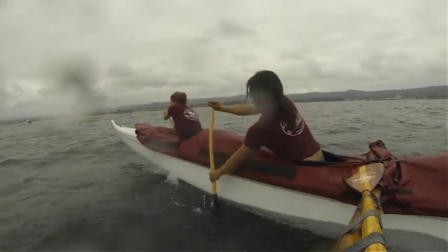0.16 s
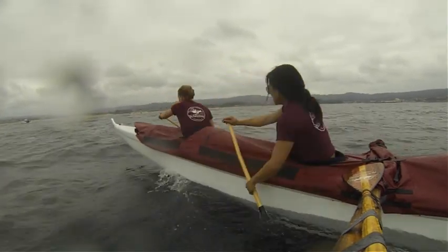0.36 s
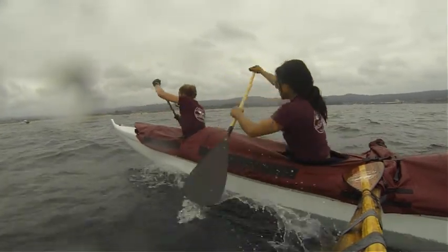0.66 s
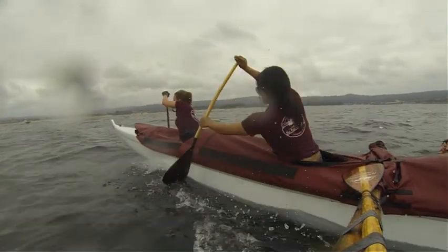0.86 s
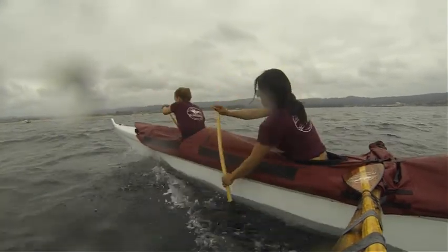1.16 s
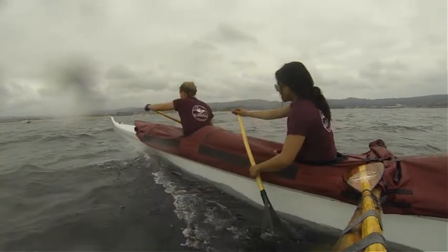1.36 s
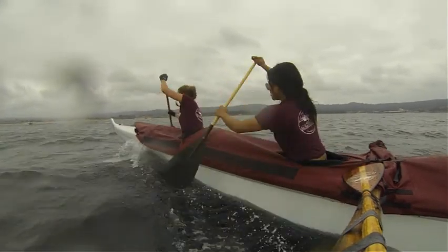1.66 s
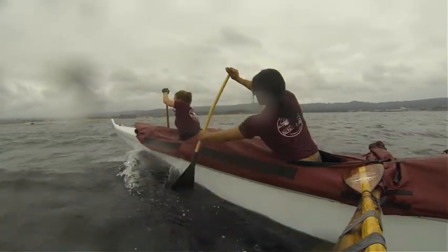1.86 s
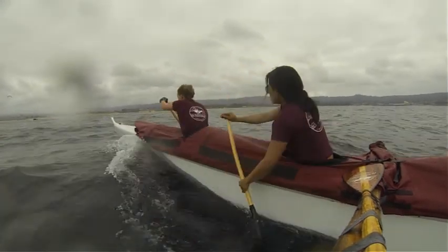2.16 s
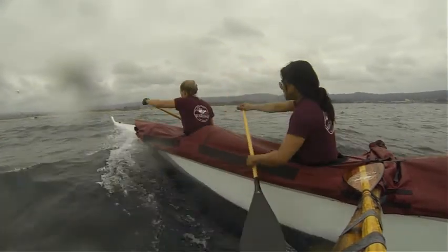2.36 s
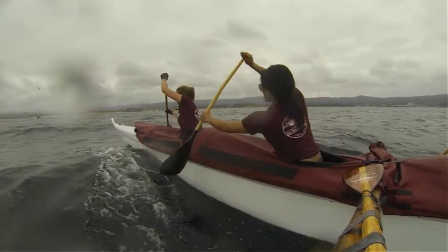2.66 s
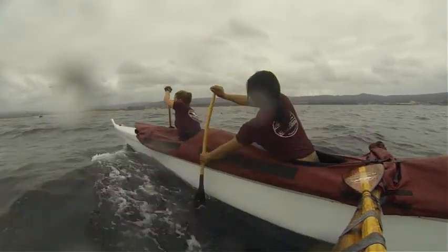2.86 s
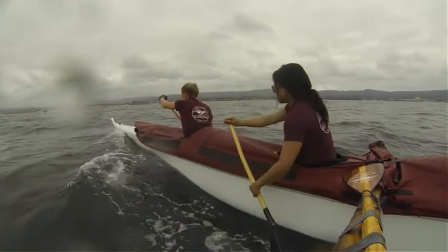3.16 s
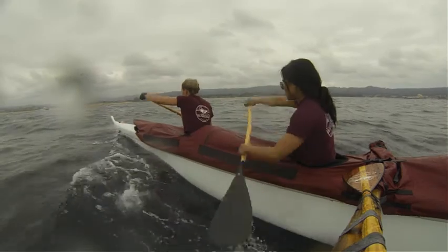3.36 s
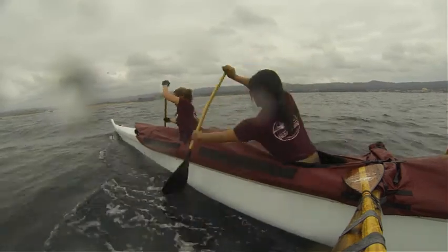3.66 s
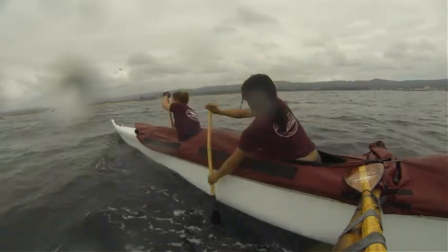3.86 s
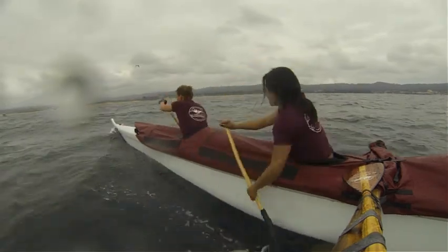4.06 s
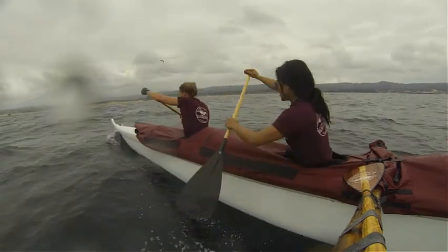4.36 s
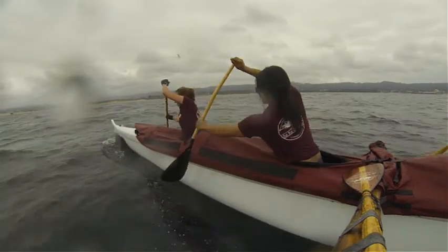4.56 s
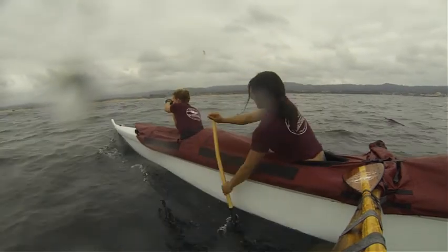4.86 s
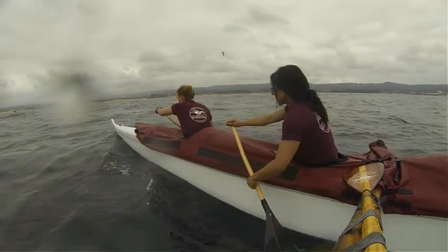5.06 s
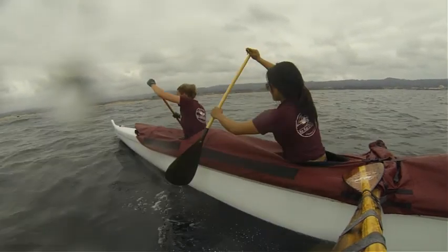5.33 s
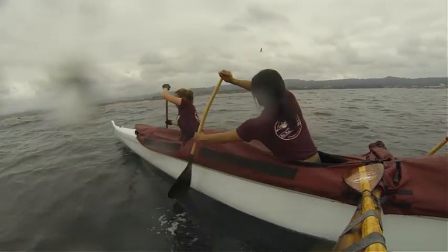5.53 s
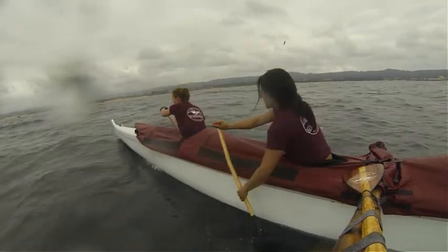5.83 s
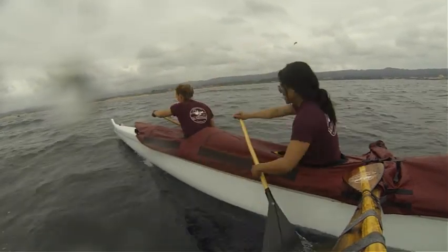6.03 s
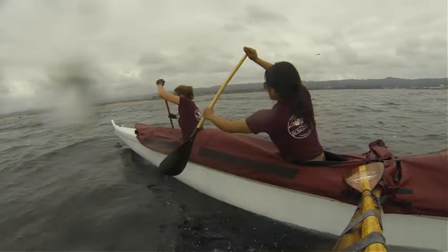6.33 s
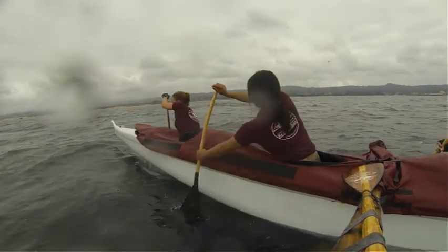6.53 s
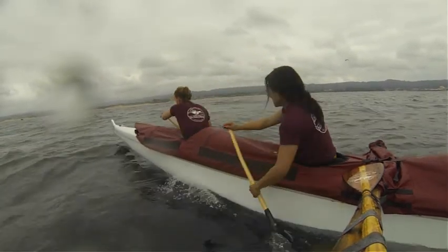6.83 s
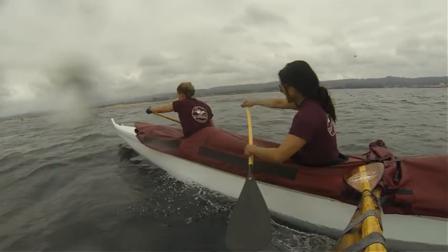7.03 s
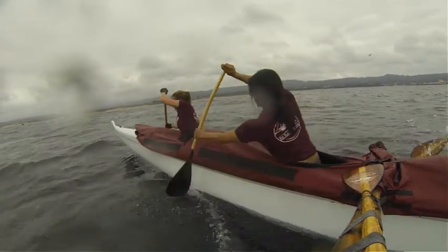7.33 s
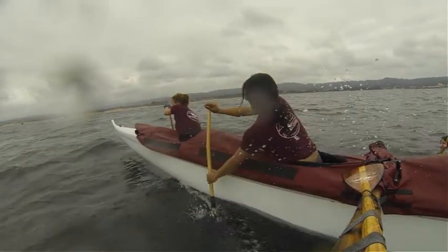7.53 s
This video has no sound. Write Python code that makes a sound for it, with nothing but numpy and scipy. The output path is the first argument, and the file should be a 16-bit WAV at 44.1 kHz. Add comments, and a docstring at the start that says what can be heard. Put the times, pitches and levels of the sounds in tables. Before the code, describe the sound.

A microphone in a sealed housing on an outrigger canoe's boom hears choppy water closely but muffled. Deep slow-pulsing sway, low rumble, a wavering thrum and soft bubbling hull wash run throughout, with thin fizz and faint whistles tracking the bass. From 0 to 0.6 s, waves hit in a dense cluster of loud hollow knocks, quickly smothered. It thins to lighter knocks and single splashes until about 1.9 s, when a quick run of plopping splashes arrives. A hard knock rings at 2.5 s. From 3.1 to 3.5 s splashes come in a longer, busier run, with more at 3.8 s. Knocks crowd between 3.8 and 5 s, and the wash swells around 4.7 and 5.6 s. Knocks and splashes mix again at 5.6 to 6.4 s, then ease, with a firm thud near 7 s. The strongest splash bursts at 7.5 s, just before the end.

```python
"""A microphone in a sealed housing rides a canoe's outrigger boom in chop; sway, thrum and wash run throughout.
0-0.6 s: dense knocks, damped modes struck by waves. 1.9 s: a run of splashes, plops plus noise bursts.
2.5 s: hard knocks. 3.1-3.5 s: a longer run of splashes. 3.8-5 s: frequent knocks. 5.8-6.4 s: more of both.
7.5 s: the strongest splash. Sway is a drifting sine, thrum is narrow noise, water is noise with bubbles.
A crude rate converter mirrors the strong bass into faint whistles throughout."""
import sys
import numpy as np
from scipy import signal
from scipy.fft import rfft, irfft, next_fast_len
from scipy.io import wavfile
from scipy.ndimage import uniform_filter1d, map_coordinates

SR = 44100
rng = np.random.default_rng(int(sys.argv[2]) if len(sys.argv) > 2 else 0)


def dump(signal):
    """Clip the signal to [-1, 1] and save it as 16-bit WAV at the path in sys.argv[1]."""
    limited = np.clip(np.atleast_2d(signal).T, -1, 1)
    pcm = np.round(limited * 32767).astype(np.int16)
    wavfile.write(sys.argv[1], SR, pcm)


def how_loud(loudness_db):
    """Turn decibels into a plain amplitude multiplier (0 dB gives 1, 20 dB gives 10)."""
    steps = np.asarray(loudness_db, float) / 20
    return 10 ** steps


N = 339040  # samples

# Levels are relative: each layer trims them.
# Slow bending of the boom: time_s, sway_db
SWAY_KNOTS = [(0.0, -22), (0.28, -23), (0.45, -35.5), (0.83, -19), (1.09, -36), (1.39, -29.5),
              (1.65, -29.5), (1.84, -35), (3.23, -29.5), (3.36, -20), (3.55, -27.5), (3.64, -42),
              (3.75, -31.5), (3.92, -41), (4.3, -27), (4.9, -22.5), (5.1, -39), (5.16, -29.5), (5.5, -37),
              (5.59, -22), (5.78, -34), (5.85, -42), (5.95, -30.5), (6.23, -32), (6.34, -24), (6.59, -40.5),
              (6.94, -29), (6.98, -34), (7.54, -22.5), (7.69, -39)]
# Passing water: time_s, thrum_db, wash_db, spray_db, fizz_db
WATER_KNOTS = [(0.0, -27.5, -35.5, -46.5, -52), (0.23, -41, -50, -56, -66.5), (0.85, -41, -48.5, -53, -62),
               (1.33, -46.5, -54.5, -61, -66.5), (1.97, -37, -50.5, -55.5, -63.5),
               (2.12, -39, -48.5, -53.5, -64), (2.5, -36, -51.5, -57, -68),
               (2.85, -43.5, -56, -58.5, -63.5), (3.08, -42.5, -46.5, -53.5, -66),
               (3.32, -35.5, -50.5, -56.5, -66.5), (3.79, -40, -50.5, -57, -64.5),
               (4.43, -34.5, -48.5, -54, -65.5), (4.67, -37, -40, -48.5, -62), (5.03, -32, -43, -48, -61),
               (5.33, -43, -53, -54, -64), (5.52, -40, -40.5, -50, -64), (5.7, -38, -40, -51, -62.5),
               (5.97, -36.5, -44.5, -52, -65.5), (6.38, -42, -51, -57, -64), (6.85, -40, -49, -53.5, -66),
               (7.3, -39, -49, -53.5, -60.5), (7.69, -41, -49, -58.5, -66)]
# Thrumming modes of the boom, upper then lower: pitch_hz, width_hz
THRUM_MODES = [(234.2, 29), (144, 19.4)]
# Waves on the hull: start_s, upper_db, lower_over_upper_db, thud_db
KNOCK_EVENTS = [(0.008, -26.5, -5, -34), (0.044, -19, -3.5, -22.5), (0.068, -13, -9.5, -35),
                (0.105, -23.5, -17.5, -34), (0.184, -30, -21, -30), (0.3, -22.5, -22, -49),
                (0.382, -12.5, -19, -38.5), (0.392, -10, -22, -19.5), (0.523, -22.5, -2, -24.5),
                (0.584, -29, -10, -26.5), (0.872, -19, -4.5, -44), (1.0, -25, -10, -31),
                (1.298, -32, -8, -52), (1.504, -30.5, -9, -32), (1.644, -26.5, -28, -45),
                (1.865, -25.5, -15, -52), (1.889, -23, -8.5, -63), (2.219, -24.5, -14.5, -45),
                (2.364, -24, -16.5, -36), (2.504, -8.5, -10.5, -27), (2.543, -17, -4.5, -34),
                (3.039, -37, -16, -24), (3.109, -18.5, -12, -27.5), (3.156, -13, -4.5, -45),
                (3.213, -24, 4.5, -37), (3.449, -20.5, -2, -38), (3.636, -23.5, -17, -41),
                (3.688, -23, -14, -38), (3.814, -26, -4, -37), (4.099, -21, 0.5, -38),
                (4.189, -13.5, -12.5, -28), (4.31, -28, -1.5, -30), (4.372, -13.5, -30, -55),
                (4.529, -20.5, -12, -49), (4.578, -17, -16, -48), (4.637, -20, -3, -46),
                (4.764, -14.5, -29, -41), (4.89, -18, -6, -37), (4.996, -29, -6, -37),
                (5.425, -28, -23, -55), (5.581, -14, -9.5, -51), (5.615, -16.5, -11, -51),
                (5.698, -19, -7.5, -53), (5.811, -17, 0.5, -58), (5.887, -35.5, 15, -48),
                (5.982, -22.5, -17.5, -42), (5.993, -16, -9, -20.5), (6.274, -23, -21, -60),
                (6.372, -20.5, -14, -54), (6.721, -25.5, -17, -49), (6.871, -27, -19, -55),
                (6.956, -16.5, -9.5, -20.5), (7.35, -29, -0.5, -51), (7.552, -30, -2, -51)]
# Other boom modes (thud, middle, top, skin): pitch_hz, base_t60_s
BOOM_MODES = [(81, 0.1), (356.5, 0.094), (687.6, 0.13), (522, 0.052)]
# Water thrown at hull and housing: start_s, spray_db, slap_over_spray_db, fizz_over_spray_db, rise_s
SPLASH_EVENTS = [(0.085, -46.5, -23, -22, 0.0024), (0.191, -44.5, -19, -1.5, 0.003),
                 (0.518, -31.5, -21, -21.5, 0.0025), (0.585, -39, -3, -13.5, 0.0019),
                 (0.7485, -37.5, -10, -46, .002), (0.884, -34, -13, -21.5, 0.004),
                 (1.228, -43, -14, -16, 0.00065), (1.5556, -37, -11, -30, 0.003),
                 (1.854, -33, -20, -18.5, 0.0018), (1.878, -31.5, -5.5, -21, 0.0027),
                 (1.895, -32.5, -6, -21, 0.0034), (1.927, -40, -13, -22, 0.0036),
                 (1.952, -34, -3.5, -24.5, 0.0028), (1.975, -42, -4, -24.5, 0.0022),
                 (2.186, -46, -0.5, -12.5, 0.0015), (2.385, -45.5, 10, -13.5, 0.0036),
                 (2.504, -35, 10, -13.5, 0.0013), (3.0844, -39, -1, -10.5, .002),
                 (3.121, -32.5, -23, -16.5, 0.0066), (3.137, -29, -6.5, -15, 0.0049),
                 (3.149, -31, -4.5, -14.5, 0.0031), (3.357, -37, -28, -23.5, 0.00085),
                 (3.4192, -31.5, -18, -34.5, 0.0018), (3.442, -31, -12.5, -17.5, .003),
                 (3.472, -27.5, -13.5, -29, 0.0016), (3.493, -29.5, -23, -24, 0.0017),
                 (3.512, -30, -18, -30, 0.0014), (3.52, -43.5, 5, -21, 0.00099),
                 (3.537, -42, -20, -25.5, 0.00091), (3.765, -26.5, -36, -36, 0.00094),
                 (3.783, -37.5, -8, -29, 0.0013), (3.939, -33, -8, -11.5, 0.01),
                 (4.058, -36, -5, -19, 0.0042), (4.432, -33.5, -11, -28.5, 0.004),
                 (4.4866, -28, -17, -27.5, .002), (4.521, -40, 9, -18, 0.003), (4.555, -35, -6, -24, 0.005),
                 (4.785, -41.5, -6, -20, 0.0024), (5.18, -30.5, -13, -15.5, 0.0055),
                 (5.2907, -46, 6, -25, 0.00078), (5.43, -32, -28, -35.5, 0.00082),
                 (5.764, -56, -10, -8, 0.0011), (5.804, -39.5, 13.5, -12, 0.002),
                 (5.822, -42.5, 13, -14, 0.0018), (5.841, -43.5, 5, -10, 0.0023),
                 (6.2526, -30, -6.5, -17.5, 0.0027), (6.285, -37.5, -15, -26, 0.0025),
                 (6.317, -35, -15, -34, 0.0017), (6.331, -35, -2.5, -25.5, 0.0012),
                 (6.356, -48, -2, -18.5, 0.0012), (6.585, -34, -4, -13, 0.0048),
                 (6.7057, -39.5, -24, -13, 0.0007), (6.777, -53, -28, -22.5, 0.0011),
                 (6.853, -38.5, -10, -7, 0.004), (7.281, -43.5, -2, -21.5, 0.0038),
                 (7.32, -40.5, -6, -18, 0.0019), (7.403, -38, -19, -23, 0.0019),
                 (7.52, -21, -18, -21.5, 0.0039), (7.55, -39.5, -16, -21.5, 0.0012),
                 (7.576, -37, -7, -27, 0.0037), (7.652, -32.5, -34, -27, 0.00083)]
# Low rumble spectrum: frequency_hz, density_db_per_hz
RUMBLE_SPECTRUM = [(16, -27.5), (28, 2.5), (64, -11.5), (102, -19.5), (120, -22), (160, -43.5), (260, -120)]
# Hull wash spectrum: frequency_hz, density_db_per_hz
WASH_SPECTRUM = [(80, -120), (110, -4.5), (190, 1.5), (280, 1), (400, -4), (520, -8.5), (600, -16),
                 (686, -7), (780, -13), (950, -15), (1300, -120)]
# Spray in the housing's cavity: frequency_hz, density_db_per_hz
SPRAY_SPECTRUM = [(800, -58), (950, -1), (1080, -1.5), (1200, -1.5), (1340, 2.5), (1550, -2.5), (1750, -11),
                  (1950, -39), (2500, -61)]
# Fine fizz spectrum: frequency_hz, density_db_per_hz
FIZZ_SPECTRUM = [(1120, -25), (1900, 2), (2350, -3), (3090, -1), (3910, -8), (4170, -8), (5200, -9.5),
                 (5920, -13), (7830, -12.5), (8980, -15), (11700, -40), (19800, -120)]

SLIP_HZ = 3889.5  # rate of the converter's timing error
SWAY_HZ, SWAY_DRIFT_HZ = 17.1, 0.282
WANDER_SHARE = 0.055  # the water's load shifts the thrumming pitch
LOWER_DB = -5  # lower thrum mode relative to upper, in steady flow
THUD_DB, MIDDLE_DB, TOP_DB = 5.5, -12.5, -0.5  # trims: thud, middle mode re upper, top mode re slap
THRUM_T60_S, DETUNE_SHARE = (0.15, 0.29), 0.023  # base decay of upper, lower after a knock; pitch scatter
LINGER_S_PER_S = 16  # extra burst t60 per second of rise
PLOP_HZ, PLOP_SPREAD_LOG = 1349, 0.05
PUSH_S = 0.0027  # how long a hard wave leans on the hull
SOFTER_DB_PER_DB, HARD_DB = 0.45, 20  # softening once the ring tops the thud by HARD_DB
CLIMB_PER_S = 1.3  # phase stretch that bends a plop upward
CHURN_DB = 1.54  # water shakes the ring level


def unit(x):
    """x at rms 1."""
    return x / np.sqrt(np.mean(np.abs(x) ** 2) + 1e-20)


def curves(rows):
    """Each column after time_s, interpolated to every sample."""
    s, *cols = np.transpose(rows)
    return [np.interp(np.arange(N) / SR, s, col) for col in cols]


def wobble(knots_per_s):
    """A smooth random curve."""
    knots = rng.standard_normal(int(N * knots_per_s / SR) + 4)
    return map_coordinates(knots, [np.arange(N) * knots_per_s / SR])


def coloured(x, spectrum):
    """x filtered by spectrum points joined on a log frequency axis."""
    m = next_fast_len(N + 8192)
    hz, db = np.transpose(spectrum)
    bins_hz = np.fft.rfftfreq(m, 1 / SR)
    gain = how_loud(np.interp(np.log(bins_hz + 1), np.log(hz + 1), db))
    return irfft(rfft(x, m) * gain, m)[:N]


def rush(spectrum, patchy_db):
    """Noise of rms 1 with small time-frequency patches of random gain."""
    z = signal.stft(rng.standard_normal(N + 1024), nperseg=1024)[2]
    field = uniform_filter1d(rng.standard_normal(z.shape), size=4, axis=0)
    field = uniform_filter1d(field, size=4, axis=1)
    noise = signal.istft(z * how_loud(patchy_db * unit(field)), nperseg=1024)[1][:N]
    return unit(coloured(noise, spectrum))


def drops(spectrum, count, mid_hz, spread, cycles, size_db):
    """Random bubbles of varied size: short damped tones rising in pitch; rms 1."""
    u, t = rng.random((count, 2)), np.arange(1200) / SR
    hz = np.clip(mid_hz * np.exp(spread * rng.standard_normal((count, 1))), 300, 9000)
    life = t * hz / cycles
    tone = np.sin(2 * np.pi * hz * t * (1 + 0.06 * life)) * life * np.exp(-2 * life)
    size = how_loud(-size_db * np.log(1.02 - u[:, 1:]))
    at = (u[:, :1] * N).astype(int) + np.arange(len(t))
    mix = np.bincount(at.ravel(), (size * tone).ravel(), N + len(t))[:N]
    return unit(coloured(mix, spectrum))


def bursts(levels_db, t60):
    """Splash envelope; a slower rise lasts longer."""
    out, t = np.zeros(N + SR), np.arange(SR // 2) / SR
    for (s, *_, rise), db in zip(SPLASH_EVENTS, levels_db):
        decay = how_loud(db - 60 * t / (t60 + LINGER_S_PER_S * rise))
        attack = (1 - np.exp(-t / max(rise, 1 / SR))) ** 2
        out[round(s * SR):][:len(t)] += decay * attack
    return out[:N]


def strike(out, s, modes, rise, bulge=1, climb=0):
    """Adds damped (hz, db, t60_s) modes at s; bulge over 1 holds then smothers; climb bends pitch up."""
    t = np.arange(SR // 2) / SR
    blow = np.zeros(len(t))
    for hz, db, t60 in modes:
        decay = how_loud(db - 60 * (t / (t60 + 4 * rise)) ** bulge)
        blow += decay * np.sin(2 * np.pi * hz * t * (1 + climb * t))
    out[round(s * SR):][:len(t)] += blow * (1 - np.exp(-t / rise)) ** 2


def rumble():
    """Low noise whose level follows the sway at a reduced slope."""
    sway_db, = curves(SWAY_KNOTS)
    return how_loud(0.55 * sway_db - 19.0 + 0.21 * wobble(1.1)) * rush(RUMBLE_SPECTRUM, patchy_db=1.0)


def fizz(lap):
    """Fine fizz: high noise and small bubbles, with splash bursts."""
    noise = 0.8 * rush(FIZZ_SPECTRUM, patchy_db=2.5)
    bubbles = 0.37 * drops(FIZZ_SPECTRUM, count=3000, mid_hz=4044, spread=0.49, cycles=5.9, size_db=4.5)
    level = how_loud(curves(WATER_KNOTS)[3] + 1.3 + 0.25 * lap + 0.69 * wobble(9.7))
    level += bursts([db + fine - 11.0 for _, db, _, fine, _ in SPLASH_EVENTS], t60=0.09)
    return level * (noise + bubbles)


def spray(lap):
    """Spray muffled by the housing's cavity: band noise and bubbles, with splash bursts."""
    noise = 0.48 * rush(SPRAY_SPECTRUM, patchy_db=3.0)
    bubbles = 0.52 * drops(SPRAY_SPECTRUM, count=2600, mid_hz=1304.3, spread=0.225, cycles=8.5, size_db=3.5)
    level = how_loud(curves(WATER_KNOTS)[2] + 3.5 + 0.41 * lap + 2.1 * wobble(12) + 0.8 * wobble(4.54))
    level += bursts([db - 9.0 for _, db, *_ in SPLASH_EVENTS], t60=0.094)
    return level * (noise + bubbles)


def wash(lap):
    """Wash along the hull: low-mid noise and large bubbles, with splash bursts."""
    noise = 1.06 * rush(WASH_SPECTRUM, patchy_db=3.0)
    bubbles = 0.45 * drops(WASH_SPECTRUM, count=1600, mid_hz=616.5, spread=0.331, cycles=5.5, size_db=4.5)
    level = how_loud(curves(WATER_KNOTS)[1] + 1.5 + 2.0 * lap + 0.13 * wobble(29))
    level += bursts([db + slap + 0.5 for _, db, slap, _, _ in SPLASH_EVENTS], t60=0.13)
    return level * (noise + bubbles)


def sway():
    """Slow bending of the boom: a sine of drifting pitch and level."""
    sway_db, = curves(SWAY_KNOTS)
    hz = SWAY_HZ + SWAY_DRIFT_HZ * wobble(1.51)
    return np.sqrt(2) * how_loud(sway_db) * np.sin(2 * np.pi * np.cumsum(hz) / SR)


def thrum():
    """Two boom modes kept going by passing water: narrow noise on wandering carriers."""
    flow_db = curves(WATER_KNOTS)[0]
    smooth = signal.butter(2, 45, fs=SR, output='sos')
    out = np.zeros(N)
    for k, (hz, width) in enumerate(THRUM_MODES):
        pole = np.exp(-np.pi * width / SR)
        swing = rng.standard_normal(N) + 1j * rng.standard_normal(N)
        swing = signal.lfilter([1], [1, -pole], swing)
        swing = signal.lfilter([1], [1, -pole ** 3], swing)
        swing = swing / np.abs(swing) ** 0.36  # partly flattens the noise's random swells: a steadier thrum
        swing = unit(signal.sosfilt(smooth, swing))
        level = how_loud(flow_db + k * LOWER_DB + 4.44 * wobble(13))
        carrier = np.exp(2j * np.pi * np.cumsum(hz * (1 + WANDER_SHARE * wobble(7))) / SR)
        out += np.sqrt(2) * level * np.real(swing * carrier)
    return out


def splashes(churn):
    """Each splash starts with a big drop's rising plop and slaps two high boom modes."""
    plops, ring = np.zeros(N + SR), np.zeros(N + SR)
    (top_hz, top_t60), (skin_hz, skin_t60) = BOOM_MODES[2:]
    bends = np.exp(PLOP_SPREAD_LOG * rng.standard_normal((len(SPLASH_EVENTS), 2)))
    for (s, db, slap, _, rise), bend in zip(SPLASH_EVENTS, bends):
        plop = (PLOP_HZ * bend[0], db - 0.6, 0.041 + 3.4 * rise)
        strike(plops, s, [plop], rise=max(0.9 * rise, 1 / SR), bulge=0.99, climb=CLIMB_PER_S)
        top = (top_hz * bend[1] ** 0.5, db + slap + TOP_DB, top_t60)
        skin = (skin_hz * bend[0], db + slap - 5.5, skin_t60)
        strike(ring, s, [top, skin], rise=max(rise, 1 / SR))
    return plops[:N] + ring[:N] * churn


def knocks(churn):
    """Wave blows thud and ring the boom's modes until the water smothers them."""
    thuds, ring = np.zeros(N + SR), np.zeros(N + SR)
    (thud_hz, thud_t60), (middle_hz, middle_t60) = BOOM_MODES[:2]
    bends = 1 + DETUNE_SHARE * rng.standard_normal((len(KNOCK_EVENTS), 3))
    for (s, upper_db, lower_db, thud_db), bend in zip(KNOCK_EVENTS, bends):
        # less thud: the wave leans longer and rings the middle mode less
        soft_db = SOFTER_DB_PER_DB * max(upper_db - thud_db - HARD_DB, 0)
        thud = (thud_hz, thud_db + THUD_DB, thud_t60)
        middle = (middle_hz * bend[2] ** 3, upper_db + MIDDLE_DB - soft_db, middle_t60)
        strike(thuds, s, [thud, middle], rise=PUSH_S)
        ring_db = (upper_db - 2.0, upper_db + lower_db - 4.0)
        modes = [(hz * b, db, t60) for (hz, _), b, db, t60 in zip(THRUM_MODES, bend, ring_db, THRUM_T60_S)]
        strike(ring, s, modes, rise=PUSH_S * how_loud(soft_db), bulge=1.347)
    return thuds[:N] + ring[:N] * churn


def scene():
    """Water, boom and hull at one microphone; lap is shared by the water, churn by the struck modes."""
    lap = wobble(14)
    churn = how_loud(CHURN_DB * wobble(45))
    water = fizz(lap) + spray(lap) + wash(lap)
    return (rumble() + water + sway() + thrum() + splashes(churn) + knocks(churn))[None]


def low_pass(x):
    """Removes everything above the highest recorded frequency."""
    return signal.sosfilt(signal.butter(12, 9130, fs=SR, output="sos"), x)


def record(dry):
    """Input stage rounds off high peaks; converter adds a periodic timing error times the sound's slope."""
    turn = 2 * np.pi * SLIP_HZ * np.arange(N) / SR
    slip_samples = 0.25 * np.sin(turn) + 0.11 * np.sin(2 * turn)
    rounded = dry / (1 + np.abs(dry / 0.4) ** 5) ** (1 / 5)
    mix = rounded + slip_samples * np.gradient(rounded, axis=1)
    return low_pass(mix)


dry = scene()
out = record(dry)
dump(out)
```